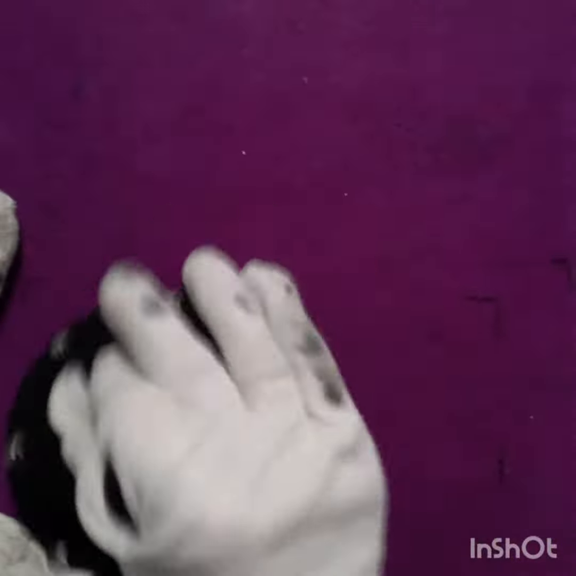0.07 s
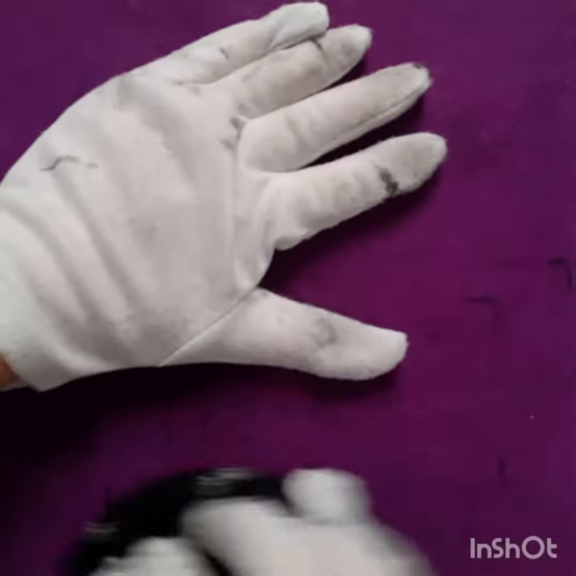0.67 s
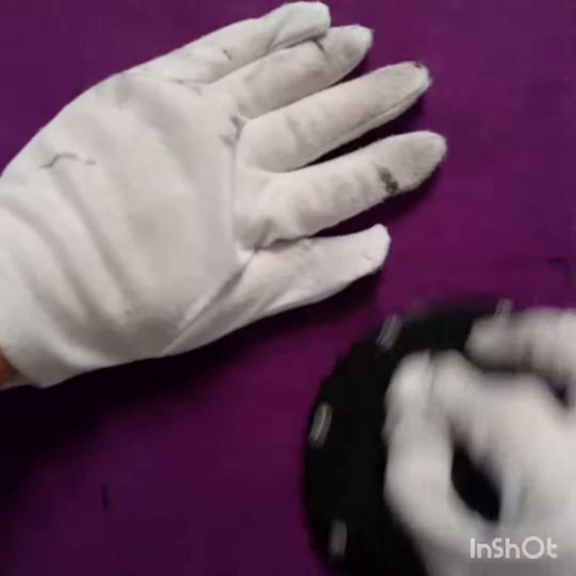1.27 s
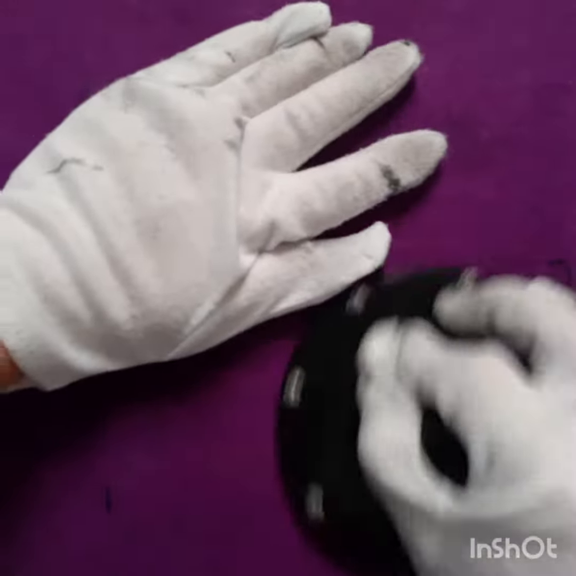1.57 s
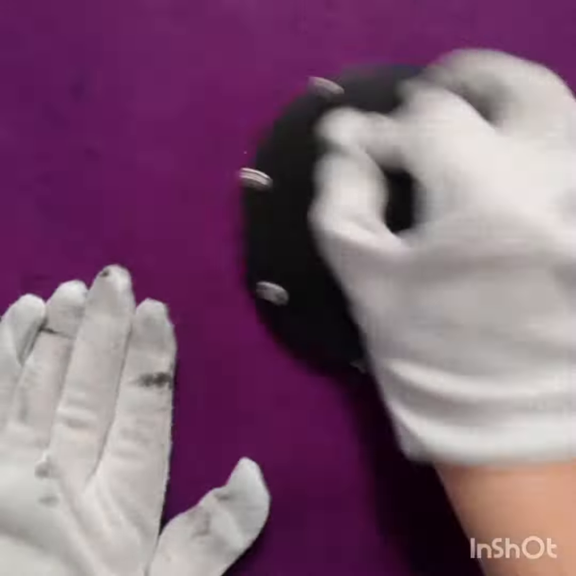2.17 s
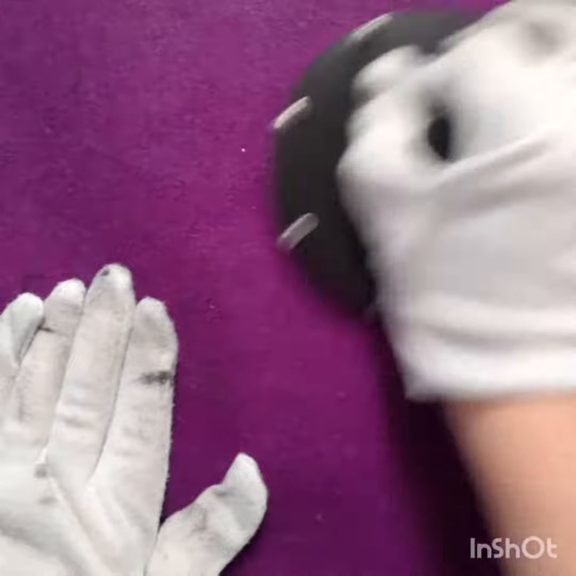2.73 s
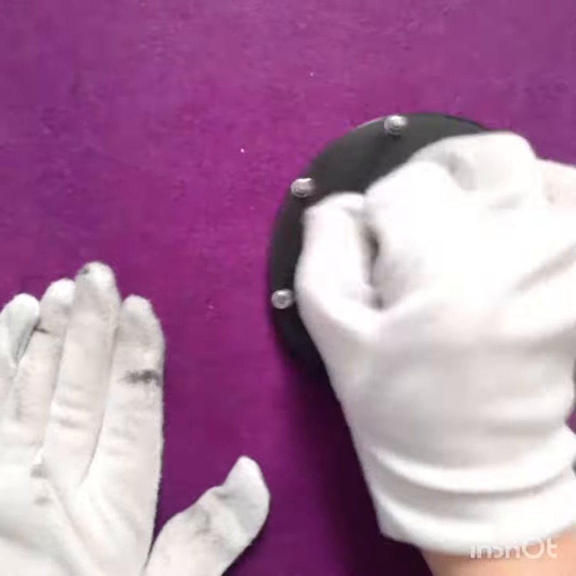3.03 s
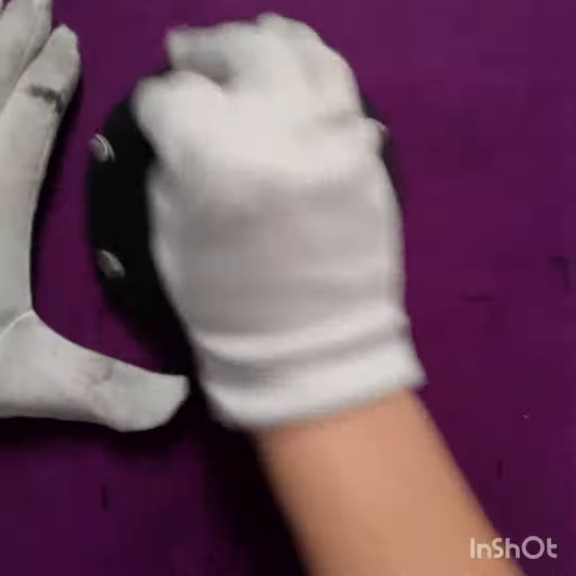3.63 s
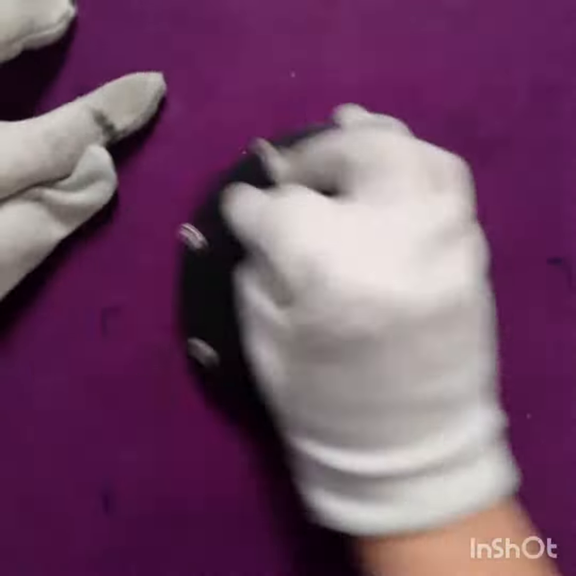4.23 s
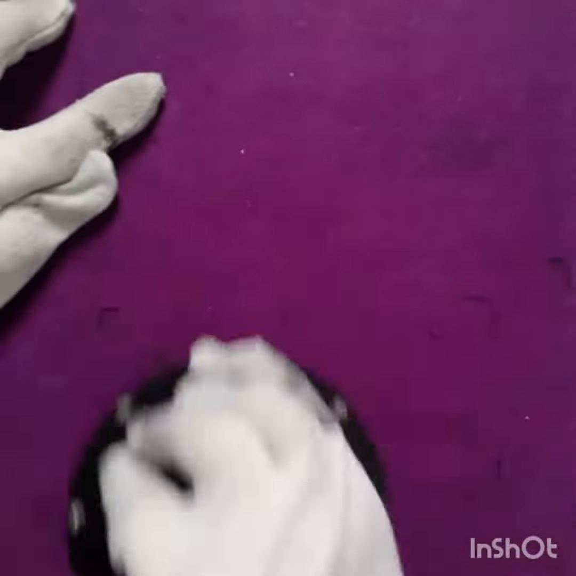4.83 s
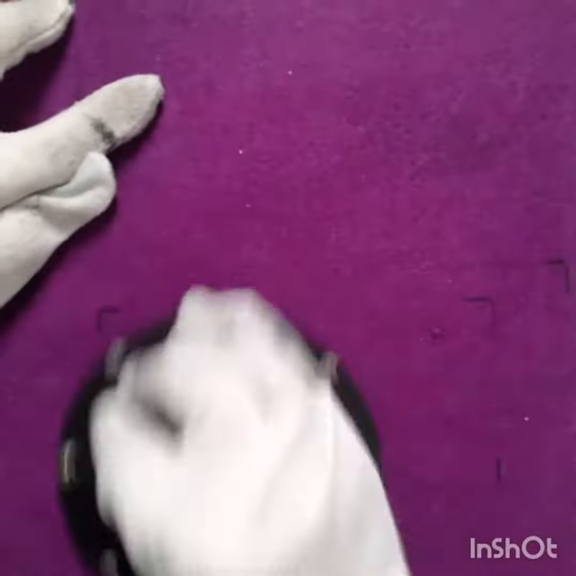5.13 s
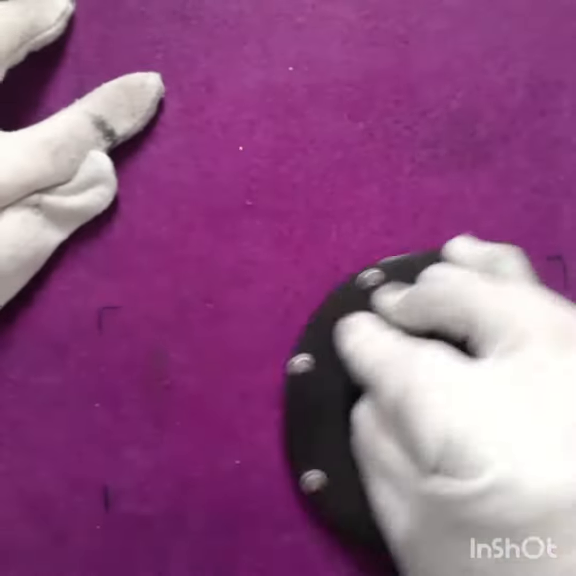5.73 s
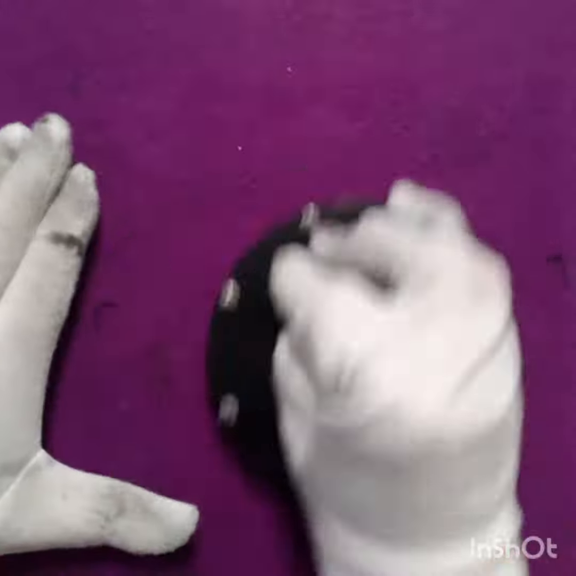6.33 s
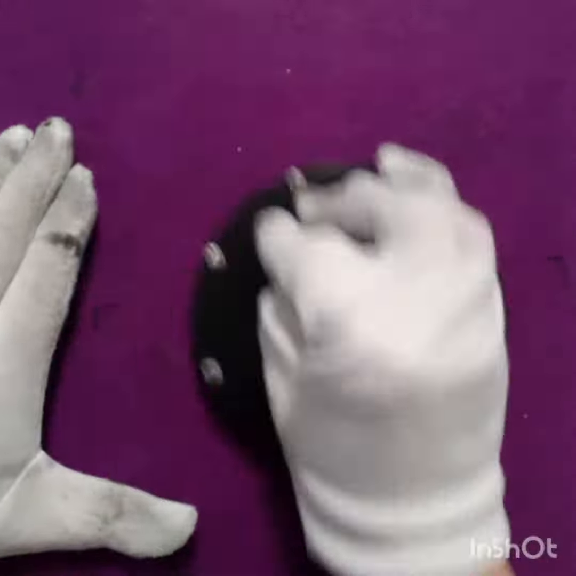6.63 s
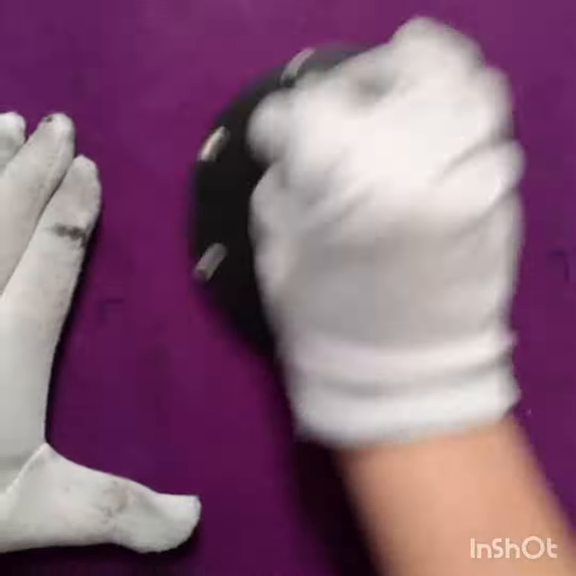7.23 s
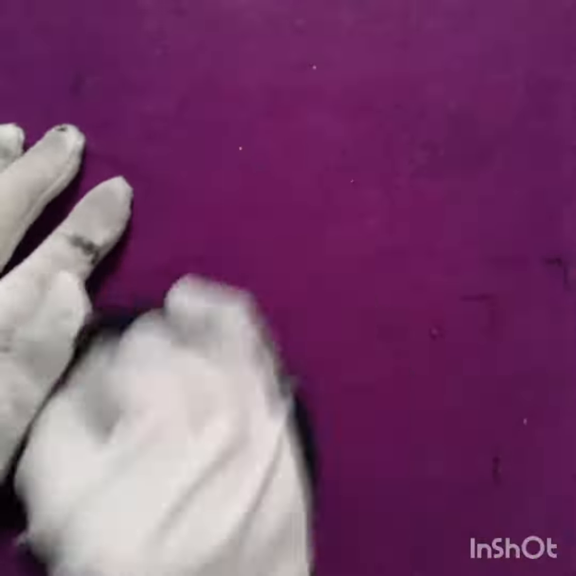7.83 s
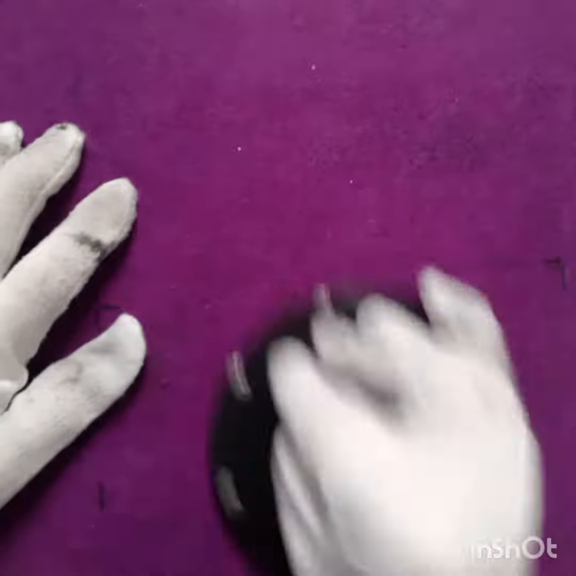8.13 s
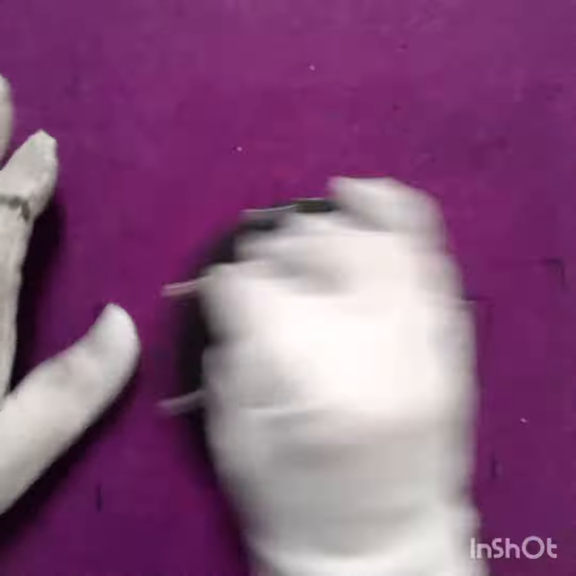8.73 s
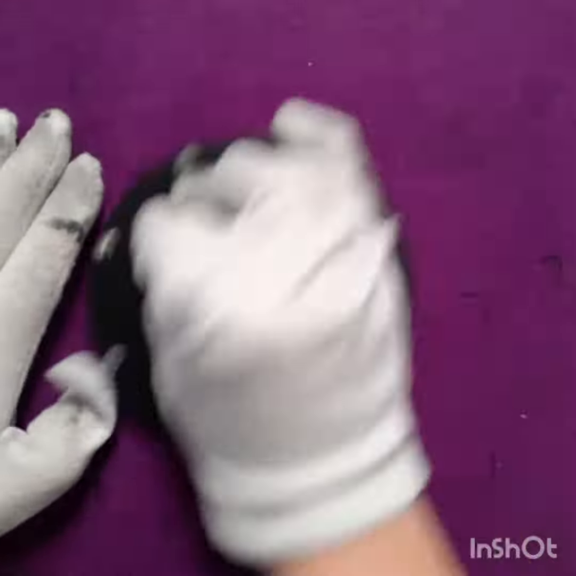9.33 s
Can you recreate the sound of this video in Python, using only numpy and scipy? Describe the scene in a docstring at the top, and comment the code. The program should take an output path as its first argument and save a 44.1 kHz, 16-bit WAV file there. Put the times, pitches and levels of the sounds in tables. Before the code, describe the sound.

Loose steel ball bearings rattle and grind in quick surges as a disc is swirled over a rumbling, thumping table.

```python
"""At a covered table in a quiet room, a gloved hand swirls a disc on loose steel ball bearings.
The balls chatter in their cups in quick surges, one for each shove, and grind over the surface.
Now and then one clacks hard, ticks or buzzes. Their bumping makes the table top rumble and thump,
and the dragging disc adds a low murmur. The hand halts briefly a few times."""
import sys
import numpy as np
from scipy import signal
from scipy.fft import rfft, irfft
from scipy.io import wavfile
from scipy.ndimage import uniform_filter1d

SR = 44100
rng = np.random.default_rng(int(sys.argv[2]) if len(sys.argv) > 2 else 0)


def inscribe(sig):
    """Save sig as 16-bit PCM at rate SR to the path in sys.argv[1].

    A 1-D sig is mono; a 2-D sig holds one channel per row.
    Samples are clipped to [-1, 1] before scaling.
    """
    pcm = np.round(np.clip(np.atleast_2d(sig).T, -1, 1) * 32767)
    wavfile.write(sys.argv[1], SR, pcm.astype(np.int16))


N = 423360
TIME = np.arange(N) / SR

# steady rolling between shoves: (time [s], chatter [dB], grinding [dB], rumble [dB])
ROLLING = [(0.0, -45.5, -50, -48), (0.55, -45.5, -40, -51.5), (1.0, -37.5, -44, -46.5),
           (1.25, -39, -41.5, -44), (1.7, -41.5, -43, -48.5), (1.92, -42, -45.5, -49),
           (2.1, -38.5, -46.5, -38.5), (2.4, -43, -46, -33.5), (2.9, -45.5, -45, -56),
           (3.5, -49.5, -53.5, -45), (4.5, -47, -49, -39.5), (4.95, -43, -46.5, -39.5),
           (5.75, -41, -42.5, -48), (6.3, -54, -49.5, -42.5), (6.9, -50, -51.5, -39),
           (7.3, -44, -48.5, -41.5), (7.65, -47, -48, -39.5), (8.05, -34.5, -42, -37.5),
           (8.25, -38, -40.5, -39), (8.4, -42, -40, -47.5), (8.55, -42, -42.5, -39),
           (8.9, -41, -48.5, -33.5), (9.6, -47, -49.5, -42.5)]
# each shove spins the balls up: (start [s], length [s], chatter [dB], grinding [dB])
SHOVES = [(0.048, 0.026, -30.5, -35.5), (0.152, 0.08, -31.5, -52), (0.369, 0.047, -35, -49),
          (0.43, 0.08, -44, -39), (0.495, 0.065, -33, -34), (0.562, 0.047, -38.5, -40),
          (0.675, 0.11, -30, -35.5), (0.765, 0.15, -35.5, -39), (0.952, 0.031, -35, -49),
          (1.043, 0.029, -32.5, -38.5), (1.095, 0.033, -32.5, -50), (1.209, 0.068, -34.5, -51),
          (1.282, 0.18, -37, -53), (1.596, 0.041, -36.5, -36), (1.691, 0.044, -33.5, -33.5),
          (2.4, 0.25, -38, -45.5), (2.73, 0.05, -38, -42), (2.814, 0.1, -38.5, -43.5),
          (2.915, 0.045, -41.5, -43.5), (2.992, 0.067, -32.5, -31.5), (3.082, 0.11, -39, -40),
          (3.174, 0.074, -40.5, -41.5), (3.3, 0.06, -50, -58), (3.388, 0.075, -41.5, -48),
          (3.511, 0.11, -39, -41.5), (3.769, 0.055, -42, -42), (3.845, 0.055, -33, -42.5),
          (3.932, 0.085, -36.5, -41.5), (3.994, 0.06, -33.5, -40), (4.065, 0.056, -38, -47),
          (4.095, 0.095, -37.5, -47), (4.182, 0.047, -39, -56), (4.244, 0.037, -44, -46),
          (4.321, 0.045, -46, -46), (4.374, 0.11, -49, -45), (4.501, 0.053, -35.5, -47),
          (4.548, 0.064, -36, -43.5), (4.623, 0.11, -37, -45), (4.747, 0.12, -35.5, -38),
          (4.861, 0.077, -32.5, -39), (4.89, 0.11, -34.5, -37.5), (4.972, 0.096, -33.5, -45),
          (5.029, 0.091, -35, -38), (5.114, 0.14, -32.5, -43), (5.26, 0.075, -30, -42),
          (5.307, 0.047, -34.5, -53), (5.368, 0.079, -29.5, -36.5), (5.429, 0.046, -28, -47),
          (5.5, 0.056, -26, -52), (5.547, 0.063, -32.5, -39.5), (5.613, 0.064, -27.5, -54),
          (5.684, 0.042, -35, -38.5), (5.747, 0.046, -38, -47), (5.813, 0.063, -37.5, -36.5),
          (5.87, 0.062, -37, -40), (6.041, 0.1, -32.5, -42), (6.15, 0.13, -36.5, -47),
          (6.287, 0.13, -34.5, -44), (6.417, 0.13, -35, -42.5), (6.488, 0.076, -33, -44),
          (6.561, 0.18, -40.5, -51), (6.729, 0.093, -42, -57), (6.774, 0.1, -37.5, -51),
          (6.9, 0.14, -50, -52), (6.948, 0.11, -37, -53), (7.088, 0.1, -35.5, -41.5),
          (7.139, 0.12, -39.5, -44), (7.229, 0.12, -38.5, -42), (7.304, 0.14, -38, -45),
          (7.42, 0.082, -43, -42), (7.501, 0.083, -37, -48), (7.596, 0.12, -37, -50),
          (7.689, 0.092, -37, -38.5), (7.806, 0.12, -29.5, -34), (7.897, 0.066, -29, -34),
          (7.977, 0.054, -30.5, -32.5), (8.016, 0.077, -32, -37), (8.118, 0.058, -29, -42),
          (8.271, 0.11, -29.5, -33), (8.457, 0.023, -32.5, -45), (8.51, 0.11, -32.5, -40.5),
          (8.64, 0.034, -32, -57), (8.7, 0.066, -34, -39.5), (8.855, 0.12, -36.5, -46),
          (9.006, 0.11, -38, -46.5), (9.162, 0.087, -36.5, -42.5), (9.218, 0.11, -32, -39),
          (9.402, 0.077, -41, -50), (9.495, 0.039, -26.5, -34.5), (9.515, 0.11, -35, -45.0)]
# the disc bears down and the rumble swells: (start [s], length [s], level [dB])
BUMPS = [(0.024, 0.094, -33.5), (0.152, 0.079, -37.5), (0.365, 0.08, -33), (0.42, 0.094, -36),
         (0.465, 0.18, -35.5), (0.663, 0.13, -34), (0.769, 0.11, -32), (1.104, .06, -50),
         (1.185, 0.048, -40), (1.28, 0.054, -37), (1.368, 0.054, -37.5), (1.552, 0.065, -43),
         (2.066, 0.051, -36), (2.134, 0.059, -38), (2.274, 0.046, -33), (2.484, 0.085, -31),
         (2.557, 0.08, -33.5), (2.684, 0.14, -34.5), (2.777, 0.14, -38), (2.834, 0.15, -39.5),
         (3.097, 0.093, -48), (3.3, 0.083, -45), (3.387, 0.088, -37), (3.52, 0.12, -29.5),
         (3.629, 0.1, -33), (3.723, 0.054, -41), (3.816, 0.076, -28.5), (3.934, 0.063, -30),
         (3.997, 0.053, -30), (4.15, 0.08, -41), (4.223, 0.12, -32), (4.407, 0.089, -36), (4.466, 0.1, -30),
         (4.635, 0.079, -38), (4.767, 0.04, -26.5), (4.836, 0.2, -35), (5.027, 0.091, -29.5),
         (5.114, 0.16, -33.5), (5.26, 0.092, -35.5), (5.387, 0.043, -31.5), (5.54, 0.08, -34.5),
         (5.61, 0.053, -40), (6.181, 0.11, -33), (6.277, 0.039, -30.5), (6.32, 0.065, -32),
         (6.4, 0.2, -32.5), (6.628, 0.15, -35.5), (6.71, 0.061, -31), (6.927, 0.055, -30.5),
         (7.109, 0.04, -30), (7.176, .04, -35), (7.229, 0.063, -29.5), (7.343, 0.046, -34),
         (7.518, 0.14, -33), (7.687, 0.055, -28.5), (7.801, 0.12, -32), (7.894, 0.057, -27.5),
         (7.991, 0.053, -30), (8.085, 0.17, -34), (8.296, 0.075, -28.5), (8.496, 0.17, -33),
         (8.637, 0.064, -35), (8.692, 0.18, -32), (8.898, 0.1, -29), (9.023, 0.04, -31), (9.08, 0.045, -39),
         (9.165, 0.06, -32), (9.222, 0.085, -28.5), (9.32, 0.06, -36), (9.452, 0.093, -28),
         (9.537, 0.11, -32)]
SHOVE_SKEW, BUMP_SKEW = 0.75, 0.66  # under 1: a swell rises faster than it falls

def hand():
    """How hard the hand drives the chatter (spin), the grinding (scrape) and the rumble (load)."""
    times, chatter_db, grind_db, rumble_db = np.transpose(ROLLING)
    starts, lengths, shove_chatter_db, shove_grind_db = np.transpose(SHOVES)
    spin = rolling(times, chatter_db, waver_db=3.0, waver_hz=31)
    scrape = rolling(times, grind_db, waver_db=1.8, waver_hz=24)
    load = rolling(times, rumble_db, waver_db=2.0, waver_hz=16)
    spin = np.hypot(spin, swells(starts, lengths, shove_chatter_db, SHOVE_SKEW))
    scrape = np.hypot(scrape, swells(starts, lengths, shove_grind_db, SHOVE_SKEW))
    load = np.hypot(load, gain_of(-1) * swells(*np.transpose(BUMPS), BUMP_SKEW))
    return spin, scrape, load

def rolling(times, levels_db, waver_db, waver_hz):
    """The strength of the steady rolling: it wavers by chance and drops when the hand halts."""
    return gain_of(np.interp(TIME, times, levels_db) + waver_db * wander(waver_hz) + halting_db())

def swells(starts, lengths, levels_db, skew):
    """A row of swells that rise quickly and fall away; where they overlap, their powers add."""
    power = np.zeros((1, N))
    for start, length, db in zip(starts, lengths, levels_db):
        progress = np.arange(0, length, 1 / SR) / length
        arch = np.sin(np.pi * progress ** skew) ** 2
        add(power, start, (gain_of(db) * arch[None]) ** 2)
    return np.sqrt(power[0])

# the hand halts or hesitates at a turn: (start [s], end [s], level change [dB])
HALTS = [(0.205, 0.364, -12.5), (1.763, 1.909, -45), (3.042, 3.108, -11.5), (3.15, 3.289, -11),
         (3.895, 3.937, 1), (4.05, 4.063, -3), (4.338, 4.367, -4), (5.095, 5.13, -1), (5.22, 5.255, -2.5),
         (5.34, 5.35, -6), (5.898, 6.044, -9.5), (5.967, 6.023, -14), (6.857, 6.9, -4), (6.975, 7.005, -6),
         (7.055, 7.077, -2), (7.448, 7.491, -21), (8.355, 8.435, -2.5), (8.932, 8.97, -3),
         (9.114, 9.16, -7.5), (9.388, 9.415, -2.5), (9.464, 9.493, -6)]

def halting_db(brake_db_per_s=610, restart_db_per_s=1092):
    """How far the rolling drops at each halt: the disc stops more slowly than it sets off."""
    total_db = np.zeros(N)
    for start, end, drop_db in HALTS:
        slopes_db = np.maximum(brake_db_per_s * (start - TIME), restart_db_per_s * (TIME - end))
        total_db += np.clip(slopes_db, drop_db, 0)
    return total_db

# the tone of a steel ball on its cup: (frequency [Hz], level [dB])
STEEL_TONE = [(200, -35.5), (650, -14), (1100, -5.5), (1800, -8.5), (2450, 1), (2900, -4.5), (3500, -1),
              (5000, 0), (5700, -2), (6800, -10.5), (8600, -22), (12000, -25.5), (15800, -38)]
# the ticking gets more uneven once the disc is shoved about: (time [s], spread of force [dB])
LOOSENESS = [(0, 3.4), (2.9, 3.4), (3.6, 6.2), (9.6, 6.2)]
# the ringing drifts with the grip and the spot on the table: (time [s], cups [Hz], grinding [Hz])
RING_DRIFT = [(0, 4280, 2100), (.65, 3400, 1410), (.95, 3570, 1630), (1.75, 3300, 1460), (2.15, 3840, 1700),
              (2.9, 4020, 1650), (3.35, 5000, 1700), (4.2, 5130, 1580), (4.4, 3800, 1810),
              (5.2, 4170, 2210), (5.8, 4240, 1640), (6.249, 3830, 1820), (7.1, 4730, 1350),
              (7.7, 4000, 1750), (8.0, 4570, 1950), (8.4, 4000, 1330), (9.15, 4860, 1520),
              (9.6, 4160, 1960)]

def chatter(spin):
    """Loose balls tick against their cups about two thousand times a second."""
    [spread_db] = curves(LOOSENESS)
    cup_hz, _ = curves(RING_DRIFT)
    hits = patter(cup_tick, per_s=2000, spread_db=spread_db, clump_db=1.5, clump_hz=52.6)
    steel = colour(stereo(hits), STEEL_TONE)
    steel += gain_of(2.0) * resonate(steel, cup_hz, width_hz=1900)
    return gain_of(-1.5) * spin * steadied(steel, 3490, 5430, size=1400)

def cup_tick():
    """One ball taps its cup and gives a tiny, high ping."""
    return contact(fade_s=0.0068, echo_db=-19, echo_s=0.06, ping_hz=rng.uniform(2200, 5500),
                   ping_db=-21, ping_s=0.018, rise_s=0.0003, size=3072)

# the tone of a ball grinding on the surface: (frequency [Hz], level [dB])
GRIND_TONE = [(100, -11.5), (350, -20.5), (630, -10.5), (820, 0.5), (1170, 1.5), (1800, -6), (2450, -5),
              (3200, 0.5), (5000, -7.5), (8500, -20), (12000, -19), (15800, -40)]

def grind(scrape):
    """The balls run over the grain of the surface in finer, duller contacts."""
    _, grind_hz = curves(RING_DRIFT)
    scuffs = patter(surface_scuff, per_s=2600, spread_db=2.5, clump_db=3.0, clump_hz=59.4, balls=4)
    grit = colour(stereo(scuffs), GRIND_TONE)
    grit += gain_of(8.5) * resonate(grit, grind_hz, width_hz=1060)
    return gain_of(0.49) * scrape * steadied(grit, 520, 2890, size=1400)

def surface_scuff():
    """One ball scuffs the surface and gives a faint, lower ping."""
    return contact(fade_s=0.0086, echo_db=-16.5, echo_s=0.11, ping_hz=rng.uniform(888.5, 3348),
                   ping_db=-24.5, ping_s=0.061, size=3072)

# a ball knocks hard on its cup: (time [s], level [dB], pitch [Hz], change per bounce [dB])
CLACKS = [(0.0493, -32, 3550, 0), (0.454, -25, 3440, -10), (1.06, -20, 3300, -4), (1.169, -19, 3040, 1),
          (2.935, -24, 4240, -14), (3.0015, -17, 2880, -9), (3.8593, -34, 5000, -10),
          (3.9584, -20, 4150, 0), (4.0118, -26, 4500, -4), (5.0065, -23, 5200, 0), (5.0157, -22, 4550, -7),
          (5.1452, -16.5, 5000, -1.5), (5.2714, -23, 3760, 0), (5.3981, -14, 2880, -8),
          (5.4432, -23, 4130, -3), (5.511, -14, 5450, -4), (5.5587, -23, 4200, -4), (5.627, -7.5, 5100, -9),
          (5.636, -18, 4030, -11), (5.7678, -21, 4720, -15), (6.2112, -15.5, 3450, -4.5),
          (6.3054, -20.5, 3470, -9), (6.512, -24, 4230, -18), (7.029, -24.5, 4680, -16),
          (7.0938, -28, 4790, -10), (7.5068, -22, 4600, -8), (7.6246, -21.5, 4000, 0.5),
          (7.8281, -9.5, 4150, -1.5), (7.841, -21, 4320, -17), (7.867, -14.5, 4650, -6),
          (7.995, -16, 5470, 1.5), (8.1358, -10, 4800, -2), (8.1405, -12.5, 5000, -14),
          (8.147, -24, 4900, -14), (8.524, -23, 4280, -5), (8.972, -25, 5570, -1), (9.097, -20, 4800, -6),
          (9.3711, -20.5, 4930, -5), (9.5021, -22, 4070, 2)]

def clacks(bounce_s=0.0021, hits=3):
    """Steel knocks on steel, and the ball bounces quickly, most often more weakly each time."""
    out = np.zeros((2, N))
    for start, db, hz, bounce_db in CLACKS:
        for bounce, gap in enumerate(bounce_s * rng.uniform(0.646, 1.4, hits)):
            hit = contact(fade_s=0.0085, echo_db=-9, echo_s=0.048, ping_hz=hz, ping_db=-9, ping_s=0.016)
            knock = colour(stereo(hit), STEEL_TONE)
            add(out, start, gain_of(db - 4.0 + bounce * bounce_db) * knock / abs(knock.mean(0)).max())
            start += gap
    return out

# a ball snaps into its seat: (time [s], peak level [dB])
SEAT_TICKS = [(0.051, -22), (0.454, -20.5), (3.09, -32), (3.856, -26), (3.958, -15.5), (5.17, -20),
              (5.272, -16), (5.281, -19), (5.51, -16), (5.56, -17), (5.769, -20), (5.918, -22),
              (5.9985, -37), (6.005, -37), (6.212, -22), (7.507, -27), (7.936, -22), (7.9585, -25),
              (8.524, -19), (8.971, -23), (9.373, -26), (9.417, -26)]
# the tone of that dry tick: (frequency [Hz], level [dB])
TICK_TONE = [(200, -13), (1000, -2), (2500, 0), (5000, 8), (7000, -11), (9000, -21), (12000, -22),
             (15800, -28)]

def seat_ticks():
    """A ball snaps into its seat with a dry tick that is over almost at once."""
    out = np.zeros((2, N))
    for start, db in SEAT_TICKS:
        hit = contact(fade_s=0.0092, echo_db=-14, echo_s=0.03, ping_hz=4800,
                      ping_db=-37, ping_s=0.008, rise_s=0.0001)
        tick = colour(stereo(hit), TICK_TONE)
        add(out, start, gain_of(db) * tick / abs(tick.mean(0)).max())
    return out

# a ball spins free for a moment: (time of the peak [s], pitch [Hz], level [dB])
BUZZES = [(1.231, 3488, -36), (1.335, 3316, -38), (3.21, 2325, -41), (3.57, 4330, -39.5),
          (3.869, 3600, -42), (4.203, 5038, -44), (4.232, 5124, -46), (4.885, 4866, -42),
          (4.941, 2600, -36), (5.012, 5100, -33.5), (5.074, 2860, -44), (5.146, 2180, -35),
          (5.326, 4840, -33), (5.564, 4100, -31), (6.098, 4823, -35.5), (6.365, 3380, -38),
          (6.824, 3280, -44), (7.03, 4900, -38), (7.213, 4608, -41), (8.26, 3574, -34.5),
          (8.301, 4306, -37), (8.583, 4220, -35), (8.722, 4306, -37), (8.911, 3600, -40),
          (9.279, 4850, -39), (9.509, 2370, -33.5)]

def buzzes(length_s=0.045, width_hz=420, size=4096):
    """A freed ball buzzes against its cup, briefly holding one metallic note."""
    out, t = np.zeros((2, N)), np.arange(size) / SR
    arch = np.sin(np.pi * np.minimum(t / length_s, 1) ** SHOVE_SKEW) ** 2
    for peak_s, hz, db in BUZZES:
        pitch = np.full(size, hz)
        noise = rng.standard_normal((2, size))
        note = resonate(resonate(noise, pitch, width_hz), pitch, width_hz)
        buzz = stereo(note) * arch
        buzz *= np.sqrt(np.mean(arch ** 2) / np.mean(buzz ** 2))
        add(out, peak_s - t[arch.argmax()], gain_of(db + 4.5) * buzz)
    return out

# the tone of the table under rolling balls: (frequency [Hz], level [dB])
TABLE_TONE = [(10, -57), (25, -51), (50, -31), (80, -14), (110, -5), (135, -1), (160, 4), (184, -10),
              (220, -9), (280, -9), (350, -19.5), (420, -32.5), (520, -40), (800, -42), (2000, -103.5)]
# harder pushes bring out the table's higher notes: (time [s], boost [dB])
HARDNESS = [(0, -5.5), (.6, 0.5), (1.7, 5), (2.0, -7), (2.9, -6.5), (3.4, -5), (3.9, 1.5), (4.6, -0.5),
            (5.1, -1.5), (5.8, 13.5), (6.5, 6), (7.3, -2), (8.2, 6), (8.8, 2.5), (9.6, 4)]

def rumble(load, pushes_per_s=700):
    """Many small pushes from the rolling balls shake the table top; heavier ones sound sharper."""
    [hardness_db] = curves(HARDNESS)
    surge = load / abs(uniform_filter1d(load, size=SR // 2))
    hardness = gain_of(hardness_db) * surge ** 0.12
    pushes = rng.standard_normal((2, N)) * (rng.random(N) < pushes_per_s / SR)
    pushes *= gain_of(1.35 * wander(35))
    shake = colour(stereo(pushes), TABLE_TONE)
    boom = signal.sosfiltfilt(signal.butter(3, 205, fs=SR, output="sos"), shake)
    shake = load * steadied(boom + (shake - boom) * hardness, 70, 330, size=1500)
    # the rumble carries little deep bass below about 70 Hz
    return gain_of(1.67) * signal.sosfilt(signal.butter(2, 70, "high", fs=SR, output="sos"), shake)

# the table top's own notes, in a low "boom" group and a higher "knock" group:
# (pitch [times the group's pitch], level [dB], fade time [share of the thump's])
TABLE_NOTES = {"boom": [(.76, -9.5, 0.86), (1.03, 1, 1)], "knock": [(.82, -5.5, 0.7), (1, 0.5, 0.68),
               (1.2, -5.5, 0.59), (1.5, -14, .7), (1.8, -19, .45)]}
# a ball jolts the table, and the spot where it lands sets the pitch:
# (time [s], boom pitch [Hz], boom level [dB], knock pitch [Hz], knock level [dB], fade time [s])
THUMPS = [(0.029, 160, -29.5, 270, -37, 0.15), (0.372, 158.4, -28.5, 265, -39, 0.18),
          (2.135, 154, -29, 270, -39, 0.15), (2.285, 154, -29, 265, -34, 0.14),
          (2.421, 141, -24.5, 270, -38, 0.12), (2.495, 155, -30, 271, -37.5, 0.13),
          (3.386, 151, -29, 263, -41, 0.14), (3.554, 146.3, -25, 266, -33, 0.21),
          (3.771, 151, -18, 270, -33, 0.09), (3.843, 156, -21.5, 270, -26.5, 0.22),
          (3.947, 132, -23, 261, -22.5, 0.12), (4.004, 144, -30, 266, -31, 0.11),
          (4.126, 159.3, -21, 252, -26, 0.18), (4.25, 162.3, -21.5, 273, -24, 0.16),
          (4.374, 145, -31, 310, -33, 0.12), (4.492, 152.6, -23, 281, -30.5, 0.2),
          (4.549, 152, -25, 236, -34, 0.098), (4.635, 142, -33, 285, -34, 0.15),
          (4.76, 152.6, -24, 272, -29.5, 0.2), (4.789, 154, -21.5, 274, -44, 0.14),
          (5.052, 142, -30, 296.6, -28, 0.21), (6.36, 142, -25, 287, -32, 0.37),
          (6.429, 152, -21, 272, -30, 0.17), (6.578, 149.5, -24, 256, -32, 0.14),
          (6.732, 147, -23, 263.4, -27.5, 0.2), (6.805, 141, -27, 275, -39, 0.12),
          (6.865, 149, -26, 257, -36, 0.23), (6.917, 144, -22, 249, -31, 0.14),
          (7.011, 153, -23, 290, -36, 0.18), (7.085, 147.6, -26, 265, -20, 0.15),
          (7.115, 150, -28, 256, -34, 0.17), (7.246, 159, -24.5, 263, -26, 0.14),
          (7.343, 152, -29, 262, -30, 0.1), (7.561, 153.6, -22.5, 283, -36.5, 0.22),
          (7.69, 155, -24, 287, -26.5, 0.14), (7.8, 170, -30, 264, -30.5, 0.2),
          (8.034, 151, -29, 266, -29, 0.21), (8.284, 131, -24, 321, -29.5, 0.19),
          (8.639, 148, -25, 283, -33.5, 0.16), (8.718, 150, -24, 238, -26, 0.16),
          (8.775, 146, -24, 299, -35, 0.17), (8.837, 156, -23.5, 252, -34, 0.18),
          (8.897, 152, -17.5, 254, -21.5, 0.19), (8.94, 153.6, -18.5, 256, -29, 0.23),
          (9.012, 141, -25, 286, -26, 0.15), (9.035, 135, -22, 267, -35, 0.067),
          (9.168, 147, -28, 259, -22.5, 0.13), (9.25, 156, -21.5, 277, -25.5, 0.19),
          (9.338, 153, -24, 287, -38, 0.11), (9.433, 166, -22, 292, -31.5, 0.11),
          (9.555, 148, -27, 269, -26, 0.14)]

def thumps(rise_s=0.0085, detune=0.022, size=8192):
    """A soft jolt rings the table top with a low boom and a hollow knock; the hand damps both."""
    out, t = np.zeros((2, N)), np.arange(size) / SR
    for start, boom_hz, boom_db, knock_hz, knock_db, fade_s in THUMPS:
        for group, hz, db in [("boom", boom_hz, boom_db), ("knock", knock_hz, knock_db)]:
            multiple, note_db, share = np.transpose(TABLE_NOTES[group])[:, :, None]
            pitches = hz * multiple * (1 + detune * rng.standard_normal(multiple.shape))
            fades = gain_of(note_db - 60 * t / (fade_s * share))
            notes = fades * np.sin(2 * np.pi * (pitches * t + rng.random(multiple.shape)))
            ring = notes.sum(0) * (1 - np.exp(-(t / rise_s) ** 2))
            thump = stereo(np.array([ring, np.zeros(size)]))
            add(out, start, gain_of(db - 5.5) * thump / thump[:, :size // 6].std())
    return out

# the tone of the disc dragging on the table: (frequency [Hz], level [dB])
DRAG_TONE = [(20, -49), (45, -12.5), (75, -1.2), (105, 0.5), (170, -5.5), (380, -11.5), (520, -26),
             (1000, -41), (2000, -80)]
# the tone of the hollow under the disc: (frequency [Hz], level [dB])
HOLLOW_TONE = [(150, -42), (300, -4.5), (370, 0.5), (470, -3), (560, -3), (700, -15), (1500, -58.5)]
# how the disc sits on the table: (time [s], murmur boost [dB], hollow ring boost [dB])
SEATING = [(0, -6, -7), (.9, -2, -1), (1.4, 5.5, 3), (2.2, 1, 0.5), (3.3, -2, -7), (4.4, 1, 4),
           (5.1, 1, -6), (5.7, 8, 1.5), (6.2, -8, 5), (6.5, 2, 11), (7.0, 9, -8), (8.1, 0, 3.5),
           (8.7, -4, -3), (9.6, 5, 2)]

def drag(spin, load):
    """The dragging disc makes a low murmur and a hollow ring that follow speed more than load."""
    murmur_db, hollow_db = curves(SEATING)
    murmur = colour(stereo(rng.standard_normal((2, N))), DRAG_TONE)
    murmur *= gain_of(murmur_db - 17.5) / murmur.std()
    hollow = colour(stereo(rng.standard_normal((2, N))), HOLLOW_TONE) * gain_of(4.1 * wander(45))
    hollow *= gain_of(hollow_db - 26.0) / hollow.std()
    return spin ** 0.55 * load ** 0.28 * (murmur + hollow)

# the tone of sliding: (frequency [Hz], level [dB])
HISS_TONE = [(1000, -36), (6000, -1.5), (9000, -12.0), (12500, -8.0), (15800, -16.0)]

def sliding_hiss(spin, flicker_db=2.0, specks_per_s=400, speck_db=7.0):
    """Sliding makes a fine, flickering hiss, speckled with tiny contacts; it swells only gently."""
    onsets = rng.random(N) < specks_per_s / SR
    specks = uniform_filter1d(onsets.astype(float), size=16) > 1e-6  # each lasts 16 samples
    grain = rng.standard_normal((2, N)) * gain_of(speck_db * specks)
    hiss = colour(stereo(grain), HISS_TONE)
    swell = spin ** 0.46 * gain_of(0.4 * halting_db() + flicker_db * wander(70))
    return gain_of(-32.5) * swell * hiss / hiss.std()

# the tone of the quiet room: (frequency [Hz], level [dB])
ROOM_TONE = [(25, -25), (110, -11), (250, -19), (600, -19), (2000, -24), (6000, -54), (15800, -57)]

def room_hush():
    """The faint, steady noise of the room."""
    air = colour(stereo(rng.standard_normal((2, N))), ROOM_TONE)
    return gain_of(-75) * air / air.std()

def contact(fade_s, echo_db, echo_s, ping_hz, ping_db, ping_s, rise_s=0.00051, size=4096):
    """One touch: a burst, a faint echo and a ping, falling 60 dB in fade_s, echo_s and ping_s."""
    t = np.arange(size) / SR
    burst, echo = rng.standard_normal((2, 2, size))
    ring = burst * gain_of(-60 * t / fade_s) + echo * gain_of(echo_db - 60 * t / echo_s)
    ping = np.sin(2 * np.pi * (ping_hz * t + rng.random((2, 1))))
    ring += gain_of(ping_db - 60 * t / ping_s) * ping
    ring *= 1 - np.exp(-t / rise_s)
    return ring / np.sqrt(np.sum(ring ** 2, axis=1, keepdims=True))

def patter(new_contact, per_s, spread_db, clump_db, clump_hz, balls=3, size=4096):
    """Uneven hits come in clumps; a few balls carry the load, and others take over as the disc rocks."""
    force = gain_of(spread_db * np.clip(rng.standard_normal(N), -3, 2.2) + clump_db * wander(clump_hz))
    force *= (rng.random(N) < per_s / SR) * rng.choice([-1, 1], N)
    per_ball = force * (rng.integers(0, balls, N) == np.arange(balls)[:, None])
    out, handover = np.zeros((2, N)), signal.windows.cosine(size)
    for start in range(0, N, size // 2):
        hits = per_ball[:, None, start:start + size]
        rings = np.array([new_contact() for _ in range(balls)])
        add(out, start / SR, signal.fftconvolve(hits * handover[:hits.shape[2]], rings, axes=2).sum(0))
    return out

# how much louder the left side is than the right: (frequency [Hz], left minus right [dB])
BALANCE = [(40, 2), (90, 2), (200, 2), (300, -1.5), (480, -1.5), (750, 6.5), (1300, 2.5), (3000, 3),
           (4400, 7), (5600, 4), (7000, -3.5), (8400, -16), (12000, -6.5), (15800, -5)]
# how alike the two sides are: (frequency [Hz], likeness [0 to 1])
LIKENESS = [(40, 0.75), (150, 1), (370, 0.87), (620, 0.52), (920, 0.86), (1500, 0.42), (2200, 0),
            (5000, 0.01), (7000, 0.0073)]

def stereo(pair):
    """Blends two unrelated sounds into left and right: alike in the bass, each with its own tone."""
    hz = np.fft.rfftfreq(pair.shape[1], 1 / SR)
    first, second = rfft(pair)
    alike = np.clip(look_up(LIKENESS, hz), -1, 1)
    lean = gain_of(look_up(BALANCE, hz))
    shared = np.sqrt((1 + alike) / 2) * first
    spread = np.sqrt((1 - alike) / 2) * second
    sides = np.array([lean * (shared + spread), shared - spread])
    return irfft(sides / np.sqrt(1 + lean ** 2 + 2 * alike * lean), pair.shape[1])

def colour(x, tone, size=8192):
    """Gives a sound the tone in a table, with a filter that rings after a hit, never before."""
    log_gain = np.log(gain_of(look_up(tone, abs(np.fft.fftfreq(size, 1 / SR)))))
    ring = np.fft.ifft(np.exp(np.conj(signal.hilbert(log_gain)))).real[:size // 2]
    return signal.oaconvolve(x, ring[None], axes=1)[:, :x.shape[1]]

def resonate(x, hz, width_hz):
    """Picks out a ringing band of the sound around a pitch that may move."""
    turn = np.exp(2j * np.pi * np.cumsum(hz) / SR)
    decay = np.exp(-np.pi * width_hz / SR)
    return 2 * (turn * signal.lfilter([1 - decay], [1, -decay], x / turn + 1e-18)).real

def steadied(x, low_hz, high_hz, size):
    """Evens out a sound so that one band holds its level, leaving only the quick grain."""
    band = signal.sosfilt(signal.butter(3, [low_hz, high_hz], "band", fs=SR, output="sos"), x.mean(0))
    power = uniform_filter1d(uniform_filter1d(band ** 2, size), size // 2)
    return x / np.sqrt(abs(power) + 1e-20)

def wander(rate_hz):
    """A smooth random wobble, about one in size and mostly slower than rate_hz."""
    hz = np.fft.rfftfreq(N, 1 / SR)
    wobble = irfft(rfft(rng.standard_normal(N)) / (1 + (hz / rate_hz) ** 2), N)
    return wobble / wobble.std()

def curves(table):
    """Turns each column after a table's times into a value for every sample."""
    times, *columns = np.transpose(table)
    return [np.interp(TIME, times, column) for column in columns]

def look_up(table, hz):
    """Reads between the rows of a frequency table, with octaves about evenly spaced."""
    frequencies, values = np.transpose(table)
    return np.interp(np.log(hz + 1), np.log(frequencies + 1), values)

def gain_of(db):
    """Turns decibels into a number to multiply by."""
    return 10 ** (np.asarray(db) / 20)

def add(mix, start_s, sound):
    """Lays a sound into the mix at a given time."""
    part = mix[:, max(round(start_s * SR), 0):][:, :sound.shape[1]]
    part += sound[:, :part.shape[1]]

def scene():
    """The hand drives the balls, the table answers, and the room lies behind them."""
    spin, scrape, load = hand()
    balls = chatter(spin) + grind(scrape) + sliding_hiss(spin) + clacks() + buzzes() + seat_ticks()
    return balls + rumble(load) + drag(spin, load) + thumps() + room_hush()

def record(dry, top_hz=15850):
    """Fades both ends so they do not click, and cuts the very highest treble."""
    eased = dry * signal.windows.tukey(N, .001)
    treble_cut = signal.firwin(511, top_hz, window=("kaiser", 9), fs=SR)
    return signal.oaconvolve(eased, treble_cut[None], "same")

dry = scene()
out = record(dry)
inscribe(out)
```